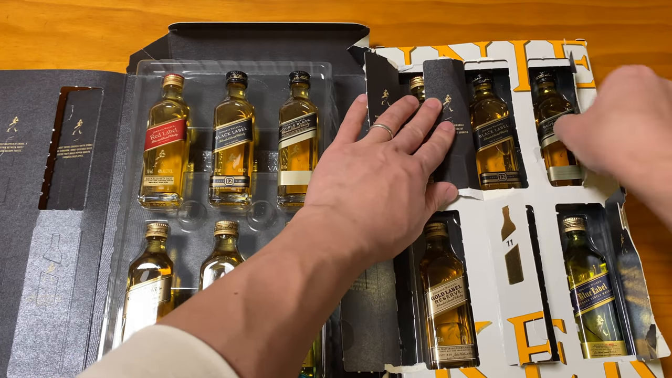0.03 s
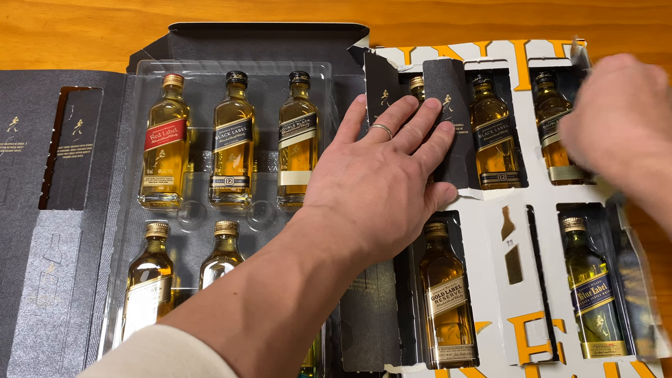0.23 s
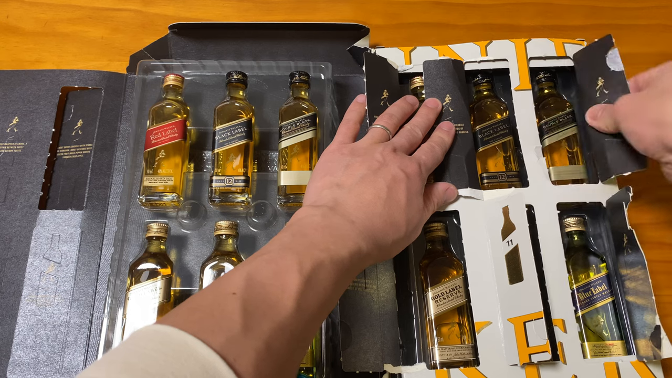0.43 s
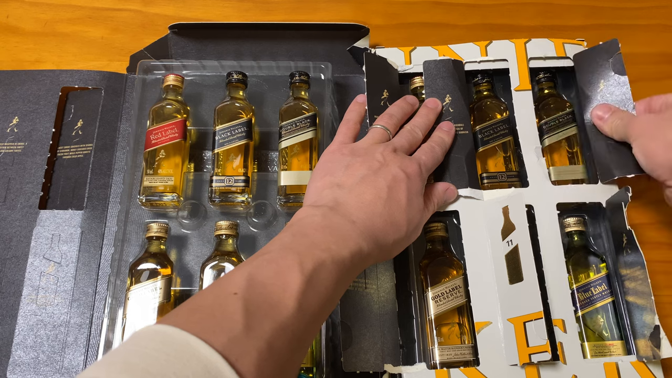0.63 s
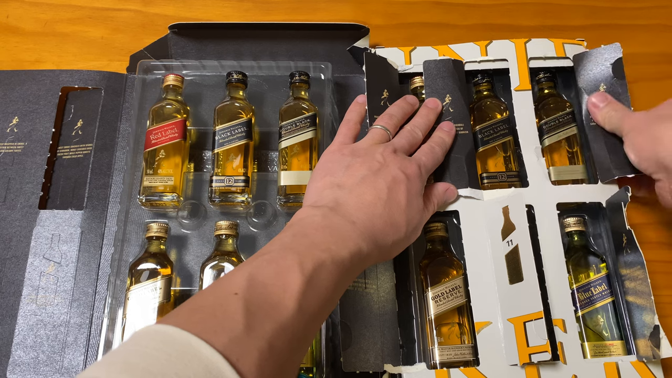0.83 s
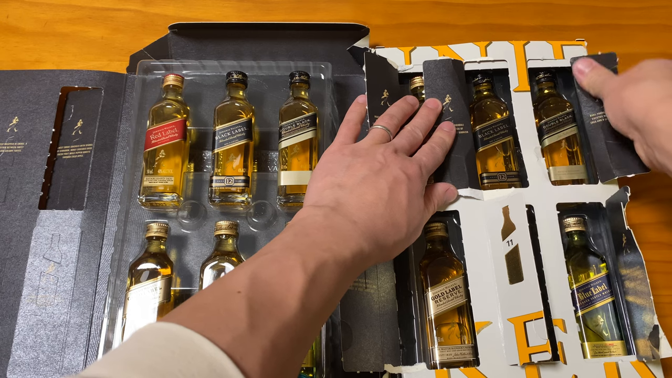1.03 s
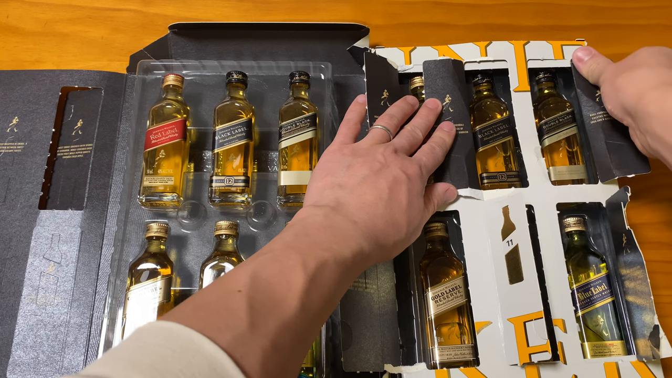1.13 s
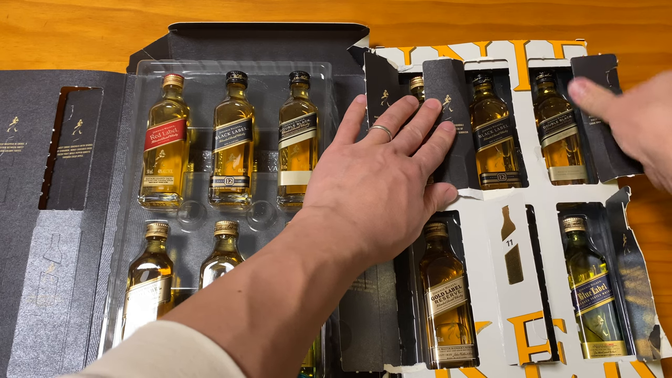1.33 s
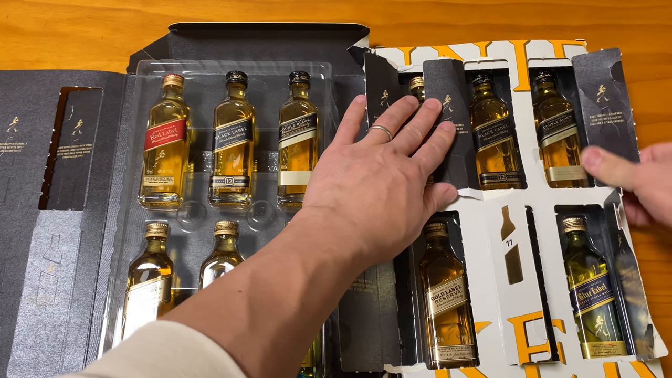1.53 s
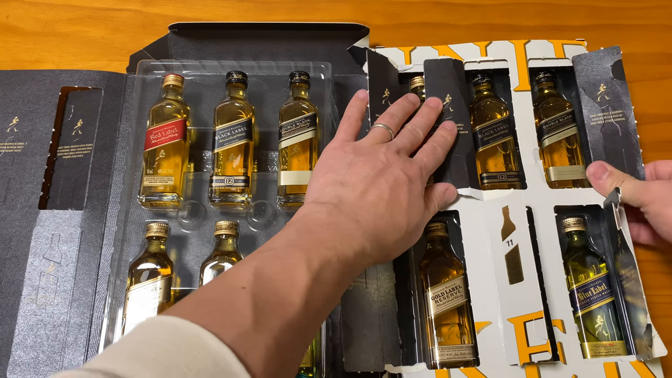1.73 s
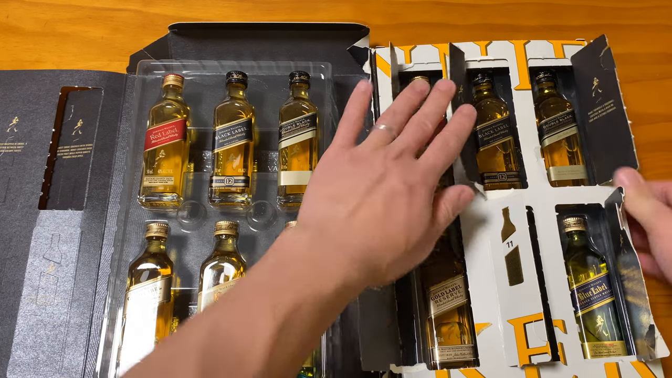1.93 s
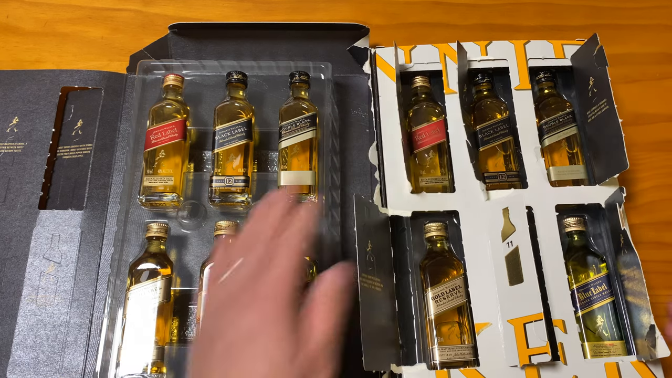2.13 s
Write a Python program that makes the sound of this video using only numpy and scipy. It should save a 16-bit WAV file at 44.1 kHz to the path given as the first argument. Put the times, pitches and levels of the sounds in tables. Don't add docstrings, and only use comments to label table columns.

```python
import sys
import numpy as np
from scipy import signal
from scipy.fft import rfft, irfft
from scipy.io import wavfile
from scipy.ndimage import uniform_filter1d

SR = 44100
rng = np.random.default_rng(int(sys.argv[2]) if len(sys.argv) > 2 else 0)


def voltage_ratio(decibels):
    exponent = np.asarray(decibels, float) / 20
    return 10 ** exponent


def digitize_waveform(pressure):
    field = np.atleast_2d(pressure).T
    bounded = np.clip(field, -1, 1)
    quanta = np.round(bounded * 32767).astype(np.int16)
    wavfile.write(sys.argv[1], SR, quanta)


N = 97020


def evened(x):
    return x / np.sqrt(np.mean(x ** 2) + 1e-20)


def read(points, hz):
    f, value = np.transpose(points)
    return np.interp(np.log(hz + 1), np.log(f + 1), value)


def add(mix, s, sound):
    part = mix[round(s * SR):][:len(sound)]
    part += sound[:len(part)]


def peak(x, hz, q):
    return signal.lfilter(*signal.iirpeak(hz, q, SR), x)


def band(x, order, low_hz, high_hz):
    return signal.lfilter(*signal.butter(order, [low_hz, high_hz], "band", fs=SR), x)


def noise(spectrum, patch_db, flicker_db, same, size):
    frames, hz = 4 * N // size + 5, np.fft.rfftfreq(size, 1 / SR)
    a, b, c, d, patch = rng.standard_normal((frames, len(hz), 5)).T
    patch = uniform_filter1d(patch, size=6, axis=0)
    patch = evened(uniform_filter1d(patch, size=8, axis=1))
    flicker = evened(uniform_filter1d(rng.standard_normal(frames), size=4))
    same = min(same, 1)
    left = a + 1j * b
    right = same * left + np.sqrt(1 - same ** 2) * (c + 1j * d)
    uneven_db = 2.7 * rng.standard_normal((len(hz), 1))
    level_db = read(spectrum, hz)[:, None] + uneven_db + patch_db * patch + flicker_db * flicker
    z = np.array([left, right]) * voltage_ratio(level_db)
    return evened(signal.istft(z, nperseg=size, noverlap=3 * size // 4)[1][:, :N])


# (frequency [Hz], level [dB])
HUM_COLOUR = [(30, -23), (46, 0), (200, -4.5), (430, -2.5), (680, -17.5), (1500, -19), (7000, -33.5),
              (16000, -39)]
# (frequency [Hz], level [dB])
MACHINE_TONES = [(139, -69), (183, -70)]


def hum():
    level_db, fade_at_s, fade_s, fade_db = -58, 2.1, 0.16, -4.5
    out = voltage_ratio(level_db) * noise(HUM_COLOUR, patch_db=1.5, flicker_db=.7, same=.8, size=2048)
    faded = np.clip((np.arange(N) / SR - fade_at_s) / fade_s, 0, 1)
    out = out * voltage_ratio(fade_db * faded)
    for hz, db in MACHINE_TONES:
        waver = uniform_filter1d(rng.standard_normal((2, N)), size=3000)
        loudness, pitch = evened(uniform_filter1d(waver, size=3000))
        phase = 2 * np.pi * np.cumsum(hz * (1 + 0.02 * pitch)) / SR
        out += voltage_ratio(db + 3 * loudness) * np.sin(phase)
    return out


# (frequency [Hz], time to fall 60 dB [s])
ROOM_DECAY = [(100, 0.85), (400, 0.21), (1500, 0.31), (5000, 0.2), (12000, 0.23)]


def room(x):
    taps = np.zeros((2, SR // 2))
    at = np.arange(200, SR // 2 - 20, 20)
    at = at + rng.integers(0, 20, (2, len(at)))
    np.put_along_axis(taps, at, rng.choice([-1., 1.], at.shape), 1)
    hz, t, z = signal.stft(taps, SR, nperseg=256)
    decay = voltage_ratio(-60 * t / read(ROOM_DECAY, hz)[:, None])
    tail = signal.istft(z * decay, SR, nperseg=256)[1]
    return signal.fftconvolve(x[None], tail / np.linalg.norm(tail[0]), axes=1)[:, :N]


# (time [s], level [dB])
SLIDE_PRESSURE = [(0, -63), (0.057, -62.5), (0.129, -78), (.24, -75), (.36, -77.5), (.68, -74),
                  (.86, -67.5), (1.03, -62.5), (1.111, -66), (1.173, -87.5), (1.213, -63), (1.378, -58),
                  (1.594, -64.5), (1.653, -83), (1.751, -65.5), (1.856, -65.5), (1.901, -78), (2.2, -94.5)]
# (frequency [Hz], level [dB])
SKIN_COLOUR = [(250, -1.5), (480, -2), (850, -11.5), (1400, -6.5), (4000, -5), (7000, -6), (11000, -8),
               (16000, -18.5)]
# (frequency [Hz], width [Hz], level [dB])
FINGER_RESONANCES = [(1316, 410, 3), (2200, 390, -11.5)]


def slide():
    level_db, catches_per_s, catch_db, catch_decay_s = 12.5, 2500, -10.5, .0008
    s, db = np.transpose(SLIDE_PRESSURE)
    caught = rng.random(N) < catches_per_s / SR
    catches = caught * voltage_ratio(4.9 * np.minimum(rng.exponential(1, N), 4))
    grit = evened(signal.lfilter([1], [1, -np.exp(-1 / (catch_decay_s * SR))], catches))
    hiss = noise(SKIN_COLOUR, patch_db=2.0, flicker_db=0.3, same=0.5, size=512)
    hiss = hiss * (1 + voltage_ratio(catch_db) * grit)
    hiss = hiss + sum(voltage_ratio(gain_db) * peak(hiss, hz, hz / width) for hz, width, gain_db in FINGER_RESONANCES)
    return evened(hiss) * voltage_ratio(level_db + np.interp(np.arange(N) / SR, s, db))


# (time [s], length [s], centre [Hz], level [dB])
CARD_BRUSHES = [
    (0.215, 0.03, 2440, -47),
    (0.486, 0.051, 1510, -76),
    (1.064, 0.075, 1520, -59.5),
    (1.702, 0.08, 1670, -51),
    (1.732, 0.035, 4600, -61),
    (1.785, 0.02, 10500, -51),
    (1.889, 0.066, 3930, -66.5),
    (2.042, 0.13, 2640, -74),
]


def brushes():
    out, draws = np.zeros(N), rng.standard_normal((len(CARD_BRUSHES), 2, 8000))
    for (s, length, hz, db), (a, b) in zip(CARD_BRUSHES, draws):
        t = np.arange(0, min(length, .18), 1 / SR)
        grit = voltage_ratio(2.6 * evened(uniform_filter1d(b, size=60)))
        rub = evened(peak(a * grit, hz, 3.5))
        add(out, s, voltage_ratio(db) * np.sin(np.pi * t / length) * rub[:len(t)])
    return out


def bend(gain, bend_s, size=4096):
    hz = np.fft.rfftfreq(size, 1 / SR)
    x = irfft(gain(hz) * np.exp(-4j * np.pi * bend_s * np.sqrt(1000 * hz)))
    return x[:size // 2] / abs(x).max()


# (frequency [Hz], level [dB])
BOX_PANELS = [(270.8, -3), (348, -2.5), (440, -6), (500, -9), (558.4, 2.5), (636.6, 1), (767, 2),
              (1030, -0.5), (1223, 8), (1480, 0), (1650, 14), (237, -9), (2100, 6)]


def ring(drive, ring_length, chance):
    t = np.arange(SR // 4) / SR
    t60_s = .11 * min(ring_length, 1.3)
    body = np.zeros(len(t))
    for (hz, db), (u, v) in zip(BOX_PANELS + BOX_PANELS, chance):
        decay = voltage_ratio(db + 2.5 * u - 60 * t * (hz / 400) ** .9 / t60_s)
        body += decay * np.sin(2 * np.pi * hz * (1 + .015 * v) * t)
    x = signal.fftconvolve(drive, body)
    return x / abs(x).max()


# (time [s], peak level [dB], brightness [Hz], ring length [1], lowest panel moved [Hz])
BOX_KNOCKS = [(.023, -43.5, 680, 1.26, 296), (.162, -41, 650, 1.16, 245), (.25, -29.5, 483, 1.2, 232),
              (.35, -44, 630, 1.5, 200), (.529, -49, 450, 0.77, 199), (0.9081, -28.5, 1690, 0.7, 152),
              (.983, -42, 864, 1.23, 250), (1.076, -45.5, 1200, 1.41, 250), (1.308, -27, 2050, 0.59, 280),
              (1.3169, -29.5, 910, 0.95, 270), (1.4036, -40, 640, 0.545, 218), (1.755, -43, 663, 0.36, 297),
              (1.793, -37.5, 800, 0.4, 200), (1.82, -49.5, 495, 0.57, 146), (1.955, -52, 274, 1.52, 120),
              (0.2373, -21.5, 860, 0.57, 256), (0.9157, -35.5, 690, 0.917, 185),
              (1.331, -39.5, 800, 0.92, 282)]


def knocks():
    bend_s, settle_s, direct_db = 0.002173, 0.011915, -5
    out, draws = np.zeros(N), rng.standard_normal((len(BOX_KNOCKS), 2 * len(BOX_PANELS) + 4, 2))
    soft = np.hanning(50) / 25
    for (s, db, hz, ring_length, low_hz), chance in zip(BOX_KNOCKS, draws):
        push = bend(lambda f: f ** 4 / (f ** 4 + low_hz ** 4) / (1 + (f / hz) ** 5), bend_s)
        wait, side = chance[-4:].T
        taps = np.zeros(SR // 20)
        taps[(abs(np.tanh(wait)) * settle_s * ring_length * SR).astype(int) + 40] = .45 * np.sign(side)
        taps = np.convolve(taps, soft)
        taps[0] = 1
        add(out, s - bend_s, voltage_ratio(db) * ring(np.convolve(push, taps), ring_length, chance))
        add(out, s - bend_s, voltage_ratio(db + direct_db) * push)
    return out


# (time [s], peak level [dB], ring [Hz], fizz [dB], sharpness of ring [Q])
FIBRE_CRACKS = [(0.1602, -33.5, 3400, 2.5, 1), (0.1924, -40.5, 1450, -1, 3.8), (0.2133, -44, 6200, 0, 2.6),
                (0.216, -46, 6100, 13, 1.8), (0.2196, -32, 1570, -17, 2), (0.3715, -52, 2400, -21, 1.6),
                (0.4421, -49.5, 4800, -4, 2), (.5013, -49.5, 2210, 4, 1.4), (0.7198, -46.5, 5060, 5, 3.2),
                (.836, -36.5, 2900, -8, 1.3), (0.9817, -45, 4200, 5, 2.4), (1.0256, -42, 4470, -6, 3.3),
                (1.075, -41.5, 1570, -14, 9), (1.1617, -52.5, 1950, 2, 1.6), (1.1883, -46.5, 1670, -4, 2.4),
                (1.248, -46, 2520, -5, 1.6), (1.2604, -31.5, 1630, -14, 5.6),
                (1.3188, -37.5, 4000, 9.5, 1.5), (1.383, -44.5, 2960, -1, 1.8), (1.625, -52, 3080, -9, 1.7),
                (1.6734, -44, 1730, -3.5, 5.5), (1.6872, -50, 7300, 1, 1.2), (1.708, -28.5, 1900, -19, 1.5),
                (1.7237, -39.5, 1850, -5, 2.5), (1.7272, -47, 3260, -14, 2.8), (1.736, -41, 2800, -6, 3),
                (1.7405, -36, 2000, 2, 1.4), (1.7459, -30.5, 2020, 1.5, 3.6), (1.755, -37, 2070, 1, 5.9),
                (1.7584, -41.5, 1910, -11, 5), (1.7694, -55, 2840, -8, 2.2), (1.7796, -49, 3000, -16, 4),
                (1.9636, -55, 6100, 3, 1.7), (2.0803, -53.5, 2500, -13, 1.4), (1.7235, -37, 3100, -9, 5.4),
                (1.7466, -41, 5300, -12, 5.2), (1.753, -41, 5200, -6, 6.3), (1.2604, -32.5, 2660, -4, 2),
                (0.1682, -44, 6300, -6, 2.8), (.2288, -22.5, 2100, -23, 9.2)]


def cracks():
    scatter_db, rise_s, scatter_t60_s, fizz_t60_s = -6.5, 0.00034, 0.015, .009
    out, t = np.zeros(N), np.arange(2000) / SR
    draws = rng.standard_normal((len(FIBRE_CRACKS), 2, 2000))
    click = bend(lambda f: f / (f + 800), .0007)[:2000]
    rise = np.minimum(t / rise_s, 1)
    for (s, db, hz, fizz_db, q), (a, b) in zip(FIBRE_CRACKS, draws):
        drive = click + voltage_ratio(scatter_db) * a * rise * voltage_ratio(-60 * t / scatter_t60_s)
        tone = peak(peak(drive, hz, 1.5), hz, max(q, .7))
        fizz = band(b, 1, 2400, 7000) * rise * voltage_ratio(-60 * t / fizz_t60_s)
        add(out, s, voltage_ratio(db) * (tone / abs(tone).max() + voltage_ratio(fizz_db) * fizz / abs(fizz).max()))
    return out


# (frequency [Hz], level [dB])
SNAP_COLOUR = [(180, -42), (255, -0.5), (480, 2.5), (900, -5), (1550, -12.5), (4000, -13), (6800, -18.5),
               (16000, -42)]
# (delay [s], level [dB])
EDGE_RETURNS = [
    (.00057, -6),
    (.0011, -8),
    (.0019, -10),
    (.0042, -17),
    (.0085, -22),
]
TABLE_TONES = [62, 108]


def snap():
    snap_s, snap_db, ring_db = .2262, -12, -23.5
    thud_s, thud_db, thud_t60_s = .243, -37, .14
    out, t = np.zeros(N), np.arange(8000) / SR
    push = bend(lambda f: voltage_ratio(read(SNAP_COLOUR, f)), .0041)
    add(out, snap_s, voltage_ratio(snap_db) * push)
    for k, (delay, db) in enumerate(EDGE_RETURNS):
        add(out, snap_s + delay, (-1) ** k * voltage_ratio(snap_db + db) * push)
    chance = rng.standard_normal((2 * len(BOX_PANELS), 2))
    add(out, snap_s, voltage_ratio(snap_db + ring_db) * ring(push, 1.0, chance))
    splinters = band(rng.standard_normal(len(t)), 2, 1000, 7500)
    decay = voltage_ratio(-30.0 - 60 * t / 0.024) + voltage_ratio(-23.0 - 60 * t / 0.062)
    add(out, snap_s + 0.001404, splinters * decay)
    thud = sum(np.sin(2 * np.pi * hz * t) for hz in TABLE_TONES)
    add(out, thud_s, thud * np.minimum(t / 0.0041, 1) * voltage_ratio(thud_db - 60 * t / thud_t60_s))
    return out


def scene():
    card = cracks() + brushes() + knocks() + snap()
    return card + voltage_ratio(-11) * room(card) + slide() + hum()


def roll_off(x):
    return signal.sosfilt(signal.butter(12, 16960, fs=SR, output="sos"), x)


# (frequency [Hz], phase [rad])
PORT_LEAD = [(100, 0), (3500, 0), (5100, 1.7), (6200, .6)]
# (frequency [Hz], level [dB])
PORT_TILT = [(120, .5), (380, -3.5), (1290, -.6), (4400, 1.8), (6500, 0)]
# (frequency [Hz], level [dB])
STRAY_SIDE = [(30, -10), (100, -9), (300, 2), (3000, 3), (5500, -2), (6800, -24), (16000, -20)]


def record(dry):
    comb_hz, comb_step_hz, top_hz, bottom_hz = 6850, 2150, 15650, 38
    hz, half = np.fft.rfftfreq(N, 1 / SR), np.array([[.5], [-.5]])
    left, right = rfft(dry)
    pair = (left + right) / 2 + half * (left - right) * voltage_ratio(read(STRAY_SIDE, hz))
    slip = np.pi * (comb_hz - hz) / comb_step_hz
    low_lead = read(PORT_LEAD + [(comb_hz, 0)], hz)
    lead = np.where(hz < comb_hz, low_lead, slip - .47 * np.sin(2 * slip))
    ports = voltage_ratio(half * read(PORT_TILT, hz)) * np.exp(1j * half * lead)
    ports = ports / (1 + (hz / top_hz) ** 60) / (1 + (bottom_hz / (hz + 1)) ** 6)
    return roll_off(irfft(pair * ports, N))


dry = scene()
out = record(dry)
digitize_waveform(out)
```